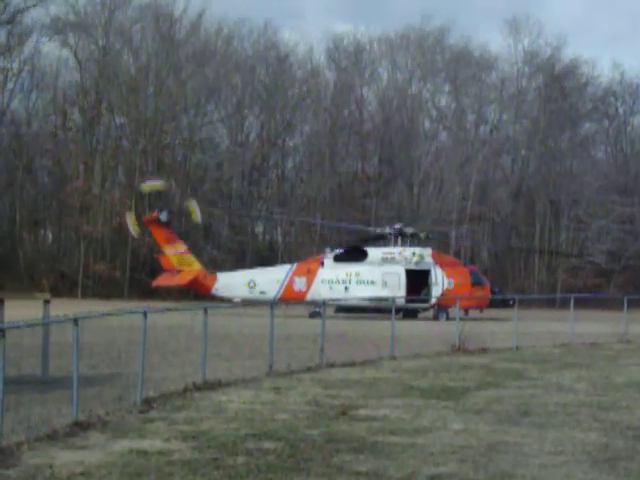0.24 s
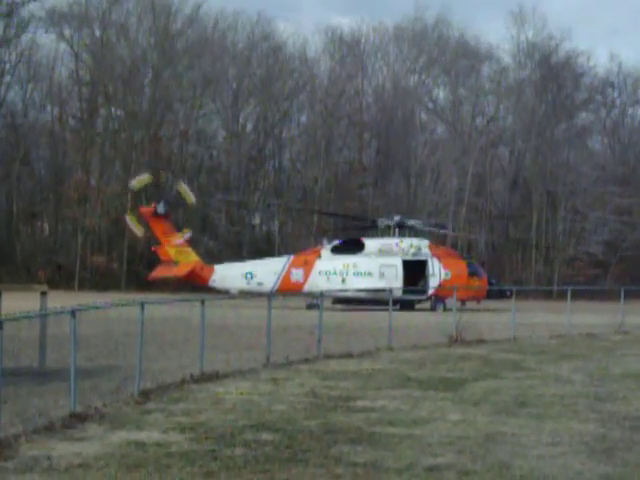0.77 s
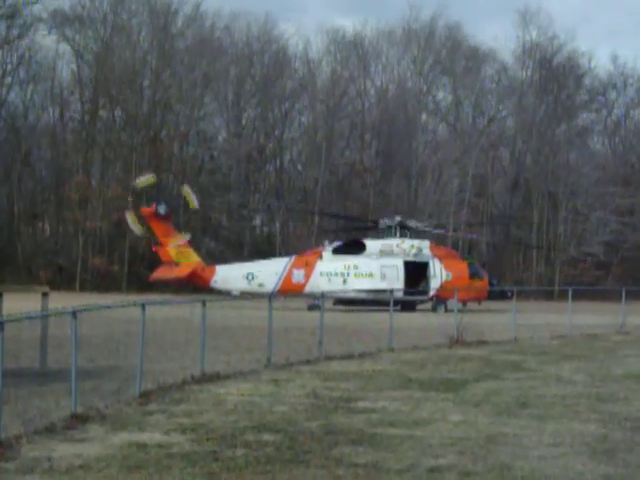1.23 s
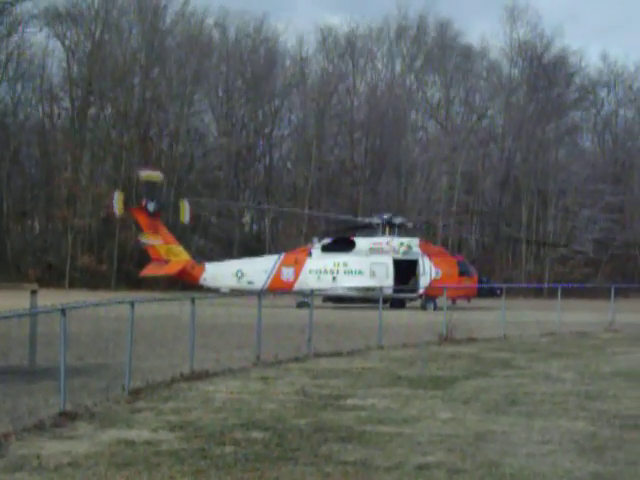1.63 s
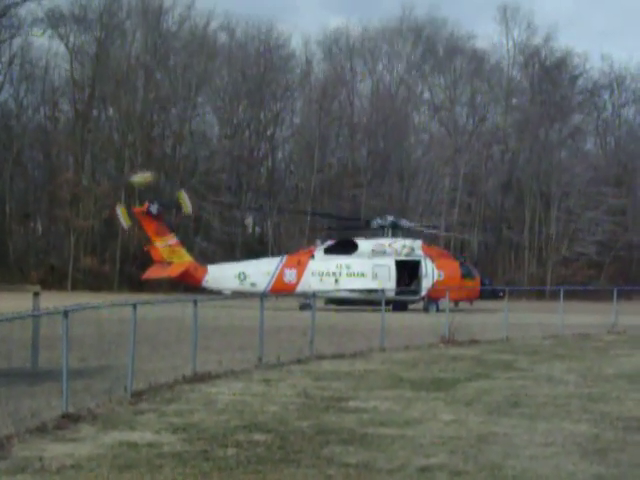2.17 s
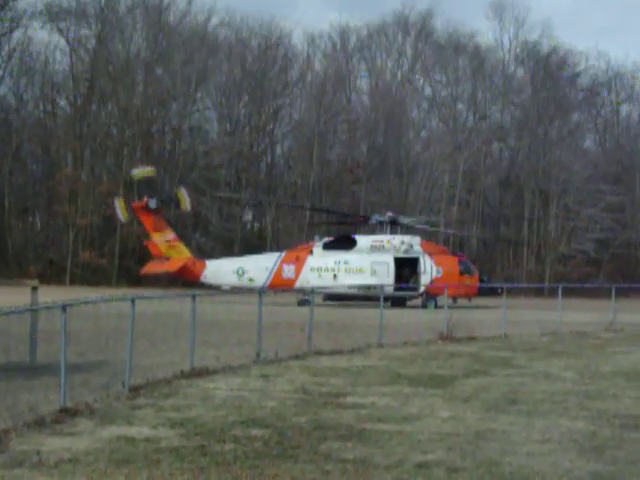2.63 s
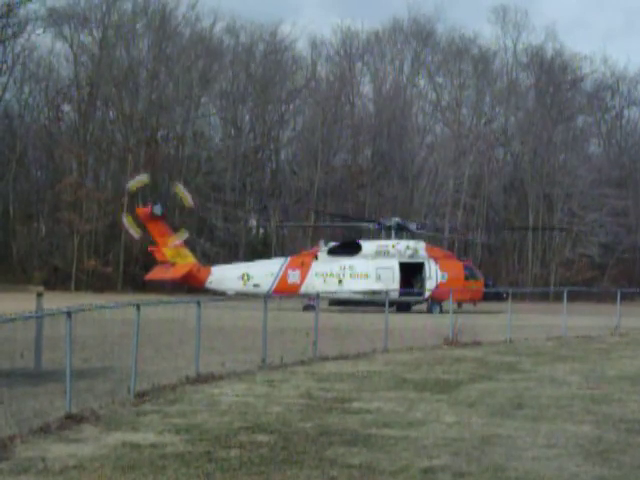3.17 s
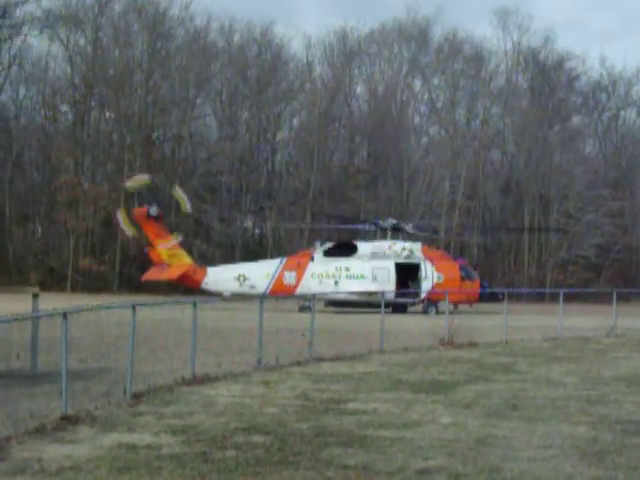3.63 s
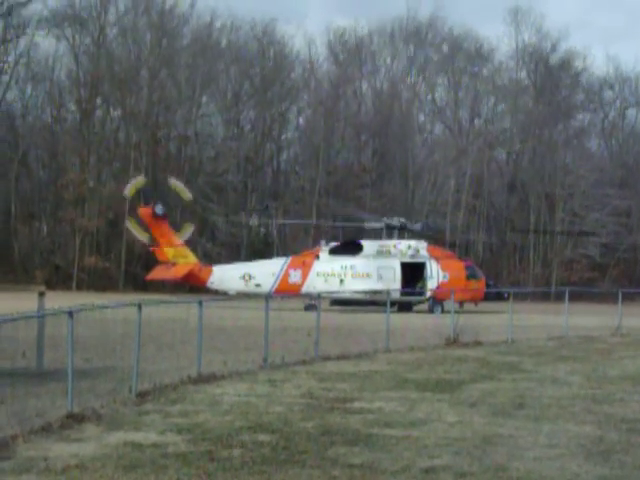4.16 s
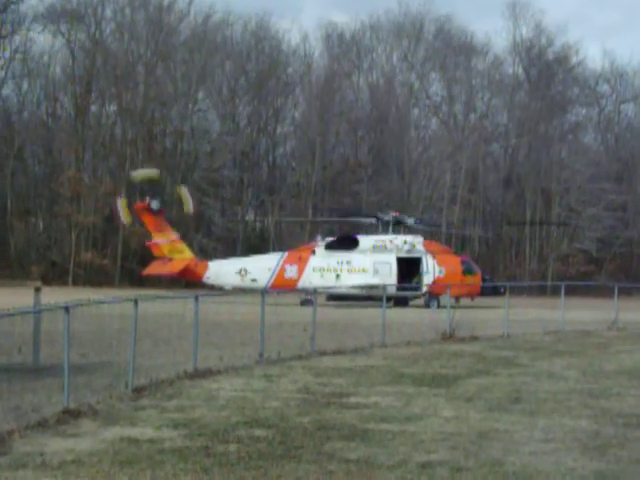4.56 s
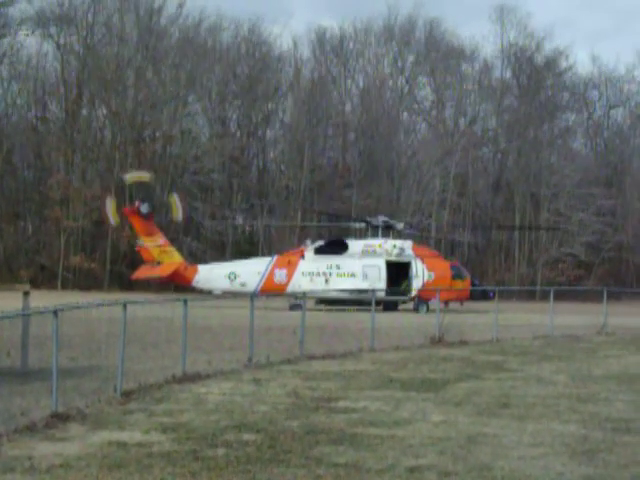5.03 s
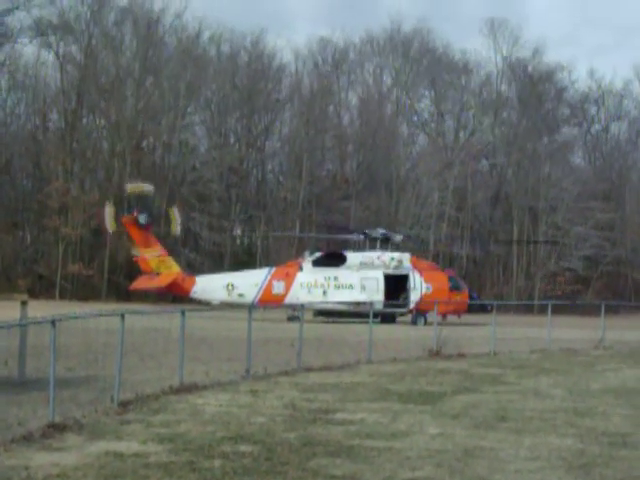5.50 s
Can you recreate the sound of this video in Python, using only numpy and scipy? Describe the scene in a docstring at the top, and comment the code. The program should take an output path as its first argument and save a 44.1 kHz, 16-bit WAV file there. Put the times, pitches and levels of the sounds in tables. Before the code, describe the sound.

Rapid, even rotor chop runs throughout without starting or stopping. Airy mid-range swishes end in short snaps, with low puffs and thumps below; engine and wind roar fills the gaps, swelling and sinking. Thumps are heaviest at the beginning. Outdoors, in mono, loud, with a clipped, boxy small-microphone sound and little high treble.

```python
"""Helicopter running on the ground

A helicopter runs across an open field, heard by a small overloaded microphone. Each main blade
sweeping towards the listener gives a swish of shaped noise and a low thump, a short pressure pulse.
Between the blades the engines and the downwash roar on as lumpy noise; the tail rotor hums and a
turbine whistles faintly, both made of sines."""
import sys
import numpy as np
from scipy import signal
from scipy.fft import rfft, irfft
from scipy.io import wavfile
from scipy.ndimage import uniform_filter1d

SR = 44100
rng = np.random.default_rng(int(sys.argv[2]) if len(sys.argv) > 2 else 0)


def ratio(d):
    """dB to gain"""
    e = np.asarray(d, float) / 20
    return 10 ** e


def output_pcm(signal):
    """Save a mono or channel-first signal as 16-bit PCM at the path in sys.argv[1].

    Samples are clipped to [-1, 1] before scaling.
    """
    pcm = np.clip(np.atleast_2d(signal).T, -1, 1) * 32767
    wavfile.write(sys.argv[1], SR, np.round(pcm).astype(np.int16))


N = 254758
BLADE_HZ, TAIL_HZ = 17.19, 79.22   # blades passing per second: main rotor, tail rotor


def rms_one(x):
    """Scale to rms 1."""
    return x / np.sqrt(np.mean(x ** 2) + 1e-20)


def band(x, low_hz, high_hz):
    """Steep band-pass."""
    return signal.sosfilt(signal.butter(3, [low_hz, high_hz], "band", fs=SR, output="sos"), x)


def drift(rate_hz):
    """Wandering chance of rms 1: noise twice through a one-pole low-pass, run in for a second."""
    r = np.exp(-2 * np.pi * rate_hz / SR)
    noise = rng.standard_normal(N + SR)
    return rms_one(signal.lfilter([1], [1, -2 * r, r * r], noise)[SR:])


def in_time(rows, column):
    """One column of a curve, in dB, at every sample."""
    rows = np.array(rows)
    return np.interp(np.arange(N) / SR, rows[:, 0], rows[:, column])


def evened(x, span_s):
    """Take out the level chance slower than the span, so that every blade speaks; rms 1."""
    power = uniform_filter1d(x ** 2, int(span_s * SR) + 1)
    return rms_one(x / np.sqrt(power + 0.12 * np.mean(x ** 2)))


def turbulence(lumpy_db, rate_hz):
    """Noise that comes in lumps, as eddies break on an edge."""
    return rng.standard_normal(N) * ratio(lumpy_db * drift(rate_hz))


def wake(memory):
    """Each blade cuts nearly the same eddies as the one before: noise that repeats and slowly changes."""
    size = int(SR / BLADE_HZ)   # samples from blade to blade
    fresh = rng.standard_normal((int(N / SR * BLADE_HZ) + 21, size))
    met = signal.lfilter([1], [1, -memory], fresh, axis=0)
    met = met[20:].ravel()   # the first 20 blades only run the memory in
    return met[(np.arange(N) * size * BLADE_HZ / SR).astype(int)]


# Resonances of the microphone port, with a slight lift near 450 Hz and a slight cut near 2500 Hz.
# Each row: centre in Hz, width in Hz, boost or cut in dB.
PORT = [(2500, 120, -1.5), (5030, 400, 4), (448, 270, 2)]


def coloured(source, spectrum):
    """Give flat noise a spectrum and the port's colour; rms 1 in the strong band 400-1400 Hz."""
    hz = np.arange(N // 2 + 1) * SR / N + 1
    points_hz, points_db = np.transpose(spectrum)
    db = np.interp(np.log(hz), np.log(points_hz), points_db)
    for centre_hz, width_hz, change_db in PORT:
        db += change_db / (1 + (2 * (hz - centre_hz) / width_hz) ** 2)
    out = irfft(rfft(source) * ratio(db), N)
    return out / np.std(band(out, 400, 1400))


# Tail rotor hum. Each row: multiple of its blade rate, rms level in dB before the slow drift.
TAIL_HUM = [(1, -44), (2, -52.5), (3, -42)]


def tones():
    """Tail rotor hum, a few harmonics of its blade rate, and a wavering turbine whistle."""
    t = np.arange(N) / SR
    hum = sum(ratio(db) * np.sin(2 * np.pi * k * TAIL_HZ * t) for k, db in TAIL_HUM)
    hum = hum * ratio(3.0 * drift(1.2))
    wander = np.cumsum(1.3 * drift(4.1)) / SR   # pitch strays by 1.3 Hz rms
    whistle = np.sin(2 * np.pi * (5136 * t + wander))
    whistle = whistle * ratio(-67.5 + 3.0 * drift(2.7))
    return np.sqrt(2) * (hum + whistle)   # a sine of this peak has rms 1


# Sound of the engines and downwash. Each row: frequency in Hz, relative density in dB per Hz.
ROAR_SPECTRUM = [(24, -57.5), (40, -24.5), (189, -7), (306, -5.5), (437, -11), (573, -1), (664, -0.5),
                 (929, -11), (1050, -7), (1570, -24.5), (2440, -25), (2700, -20), (3550, -34), (4970, -35),
                 (6000, -40), (7800, -82.5), (13200, -120)]
# The machine as the air carries it over; the blade passes below read it too.
# Each row: time in seconds, roar between the blades in dB, swish in dB, tip hiss in dB, low puff in dB.
CARRY = [(0.0, -16, -13.5, -22.5, -12.5), (0.13, -12, -9, -20, -15.5), (0.27, -12.5, -11.5, -24, -16.5),
         (0.56, -9, -11.5, -22.5, -14.5), (1.22, -17.5, -10, -16, -12), (1.74, -8.5, -9.5, -22, -16),
         (2.25, -11, -11, -20.5, -19.5), (2.46, -9, -13, -18.5, -19), (2.78, -9.5, -9, -17.5, -22),
         (2.99, -8.5, -12, -20, -22), (3.49, -9, -8, -22, -16), (3.76, -13, -7.5, -20.5, -12),
         (3.99, -10, -10, -22.5, -13.5), (4.33, -14, -9.5, -19, -21), (5.18, -9.5, -8.5, -25, -15),
         (5.78, -10.5, -14, -23, -19.5)]
# Brief changes of the roar: dips from deep to barely heard, and a last row of 0 dB that changes nothing.
# Each row: time in seconds, change in dB.
DIPS = [(0.512, -4), (0.628, -6), (.804, -3), (1.041, -5), (1.337, -4), (2.139, -1), (2.67, -4.5),
        (2.782, -2.5), (3.128, -4), (3.66, -3.5), (3.892, -4), (4.3, -5.5), (4.588, -4.5), (4.767, -0.5),
        (4.934, -1), (5.636, 0)]
# Slow gains of four bands; scene() reads the first and last.
# Each row: time in seconds, deep throb and thump in dB, roar below 440 Hz in dB,
# roar above 780 Hz in dB, everything near 450 Hz in dB.
BANDS = [(0, 10.5, -3, 5.5, -2), (.6, 3, -7.5, 2.5, 3), (1.1, 0, -1, 2, -3.5), (1.6, 0, -5, 2, -3.5),
         (2.2, 2.5, -9, -2, 0.5), (2.9, -0.5, -5.5, 1.5, 2), (3.6, -3, -10, -0.5, -1),
         (4.1, -0.5, -9, 1, 0), (4.5, 0, -6.5, 3, -4.5), (5, -5, -7.5, 3.5, -1), (5.4, -0.5, -4, 0, 1.5),
         (5.78, -3, -3.5, 0, 3)]


def roar():
    """Engines and downwash: lumpy noise that swells and sinks, chopped a little by the tail rotor."""
    t = np.arange(N) / SR
    dip_s = 0.024   # spread of each bell-shaped dip
    dips_db = sum(db * np.exp(-.5 * ((t - s) / dip_s) ** 2) for s, db in DIPS)
    level_db = in_time(CARRY, column=1) + dips_db + 1.0 * drift(5.6)
    chop = 1 + .09 * np.cos(2 * np.pi * TAIL_HZ * t)
    wash = coloured(turbulence(lumpy_db=1.5, rate_hz=110), ROAR_SPECTRUM)
    low = band(wash, 20, 440) * ratio(in_time(BANDS, column=2))
    body = band(wash, 440, 780)
    treble = ratio(in_time(BANDS, column=3))
    upper = band(wash, 780, 1400) * treble
    # the engine hiss on top sinks less than the downwash
    top_db = -1.5 + 0.084 * (np.mean(level_db) - level_db)
    top = band(wash, 1400, 7000) * treble * ratio(top_db)
    return (low + body + upper + top) * ratio(level_db) * chop


# Blade noise through the microphone, for the throb here and the swish below.
# Each row: frequency in Hz, relative density in dB per Hz.
BLADE_SPECTRUM = [(24, -56.5), (40, -36), (175, -6), (316, -2), (367, -12.5), (443, -13.5), (559, -1),
                  (648, 1.5), (1080, -8.5), (1610, -22.5), (2400, -24.5), (2720, -19), (3580, -32),
                  (5020, -37.5), (6200, -49), (8060, -88), (13600, -120)]


def blade_throb():
    """The deepest part of the wake noise beats evenly at the blade rate."""
    turn = 2 * np.pi * (BLADE_HZ * np.arange(N) / SR - .45)
    beat = ratio(-21.0 + 9.2 * (np.cos(turn) - 1))
    deep = band(coloured(wake(memory=.85), BLADE_SPECTRUM), 34, 195)
    return evened(deep, span_s=0.026) * beat


def blade_thump():
    """The air a blade pushes aside arrives as one short pressure pulse, close to the steady blade rate."""
    at_s = (np.arange(int(N / SR * BLADE_HZ)) + .5) / BLADE_HZ
    chance = rng.standard_normal((len(at_s), 2))
    at_s = at_s + .0008 * chance[:, 0]
    clicks = np.zeros(N)
    clicks[(at_s * SR).astype(int)] = ratio(-18.0 + 1.2 * chance[:, 1])
    t = np.arange(600) / SR
    push = np.exp(-.5 * ((t - .0025) / 0.0076) ** 2)
    high_pass = signal.butter(2, 110, "high", fs=SR, output="sos")
    return signal.sosfilt(high_pass, np.convolve(clicks, push)[:N])


# Single blades louder or softer than their neighbours.
# Each row: time in seconds, swish in dB, tip hiss in dB, low puff in dB.
ODD_BLADES = [(0.086, -4.5, -25, -9.5), (0.776, -6.5, -14.5, -18.5), (.957, -8.5, -15.5, -10),
              (1.012, -5.5, -19.5, -10), (1.071, -6, -19.5, -11.5), (1.132, -9.5, -20.5, -12.5),
              (1.19, -6.5, -19.5, -23), (1.244, -6.5, -18.5, -13.5), (1.306, -5, -21, -19),
              (1.365, -9, -17.5, -17.5), (1.424, -2.5, -18, -11), (1.48, -9, -15.5, -15.5),
              (1.537, -10.5, -14.5, -14), (1.881, -7.5, -27.5, -17.5), (2.233, -7, -22, -14.5),
              (2.746, -12, -22.5, -33), (3.338, -8.5, -20.5, -10.5), (3.574, -6.5, -16, -14),
              (3.692, -13, -23.5, -18), (3.811, -8, -22.5, -13.5), (3.923, -15, -20.5, -14.5),
              (4.213, -12.5, -18.5, -19), (4.386, -8, -19.5, -23.5), (4.503, -7.5, -27.5, -9),
              (4.562, -5, -21, -15), (4.622, -7.5, -22.5, -21.5), (4.798, -7, -21.5, -17.5),
              (5.088, -9, -17, -10), (5.444, -10, -22, -10.5), (5.609, -9, -24.5, -18)]


def passes():
    """Time and levels of every blade: steady rate, carried levels and chance; odd blades have their own."""
    first_s = .024
    steady_s = first_s + np.arange(int(N / SR * BLADE_HZ)) / BLADE_HZ
    carry = np.array(CARRY)
    levels_db = [np.interp(steady_s, carry[:, 0], carry[:, k]) for k in range(2, 5)]
    scatter = [0.002, 0.5, 2, 0]   # time in seconds, then swish, hiss and puff in dB
    chance = rng.standard_normal((len(steady_s), 4)) * scatter
    rows = np.column_stack([steady_s, *levels_db]) + chance
    odd = np.array(ODD_BLADES)
    places = np.round((odd[:, 0] - first_s) * BLADE_HZ).astype(int)
    rows[places] = odd
    return rows.T


def sweep(s, levels_db, rise_s, fall_s):
    """One swell per blade: it grows as the tip nears and drops sooner once it has turned away."""
    peaks = np.zeros(N)
    peaks[np.clip((s * SR).astype(int), 0, N - 1)] = ratio(levels_db)
    t = np.arange(-2000, 2001) / SR
    swell = np.exp(-.5 * (t / np.where(t < 0, rise_s, fall_s)) ** 2)
    return signal.fftconvolve(peaks, swell, "same")


def blade_swish():
    """Blade noise in four parts: low puff from the wake, lumpy swish, hiss off the tip, closing snap."""
    s, swish_db, hiss_db, puff_db = passes()
    air = coloured(turbulence(lumpy_db=4.5, rate_hz=208), BLADE_SPECTRUM)
    eddies = coloured(wake(memory=.8), BLADE_SPECTRUM)
    puff = evened(band(eddies, 167.4, 399), span_s=0.021)
    puff = puff * sweep(s, puff_db, rise_s=0.008, fall_s=0.0067)
    swish = evened(band(air, 437, 1374), span_s=.02)
    swish = swish * sweep(s, swish_db, rise_s=0.012, fall_s=0.0085)
    # the tip is heard brightest just before it turns away
    hiss = evened(band(air, 1447, 11000), span_s=0.016)
    hiss = hiss * sweep(s + 0.0037, hiss_db, rise_s=0.012, fall_s=0.004)
    # a short snap, set above the hiss, ends each blade's noise
    snap = evened(band(air, 900, 3600), span_s=.01)
    snap = snap * sweep(s + .005, hiss_db + 3.5, rise_s=0.0031, fall_s=.0015)
    return puff + swish + hiss + snap


def scene():
    """All parts from one direction; the ground echo thins or fills the sound near 450 Hz."""
    deep = (blade_throb() + blade_thump()) * ratio(in_time(BANDS, column=1))
    machine = tones() + roar() + deep + blade_swish()
    b, a = signal.butter(1, [380, 540], "band", fs=SR)
    echo_band = signal.lfilter(b, a, machine)
    echo_gain = ratio(in_time(BANDS, column=4))
    return (machine + (echo_gain - 1) * echo_band)[None, :]


def band_limit(x):
    """A steep low-pass at the top of the band."""
    return signal.sosfilt(signal.butter(12, 15800, fs=SR, output="sos"), x)


def record(dry):
    """The converter clips, its top is cut, and the ripple the cut leaves on flat tops is clipped again."""
    overload, ceiling = 0.71, .7   # of full scale
    clipped = np.clip(dry, -overload, overload)
    top_cut = signal.cheby2(6, 22, 6360, fs=SR, output="sos")   # Hz
    narrow = signal.sosfiltfilt(top_cut, clipped)
    finished = np.clip(narrow, -ceiling, ceiling) - .0034   # a small constant offset
    return band_limit(finished)


dry = scene()
out = record(dry)
output_pcm(out)
```